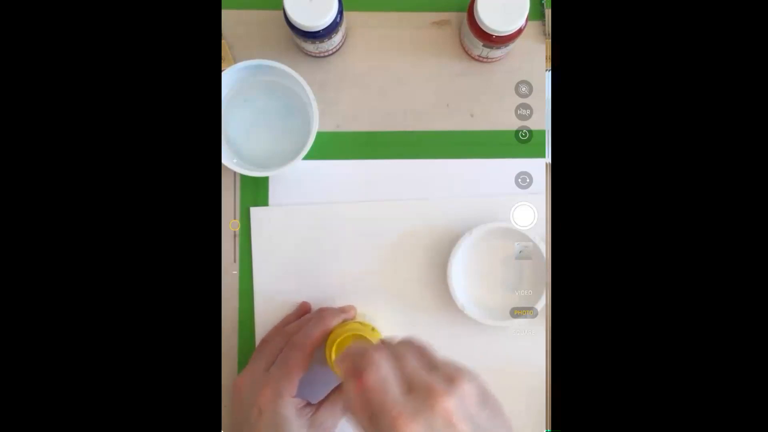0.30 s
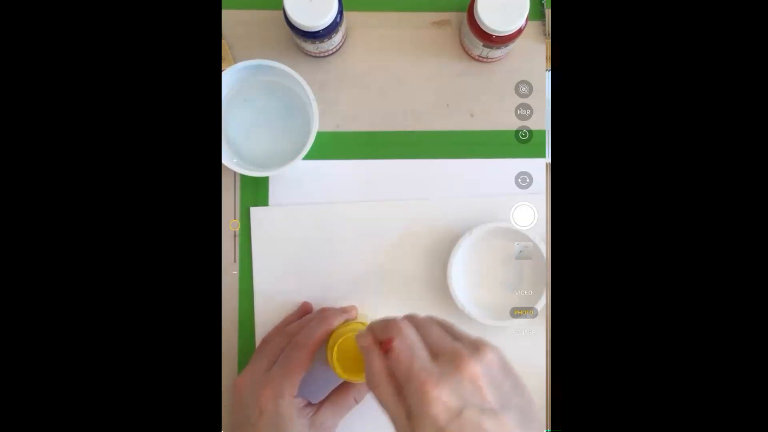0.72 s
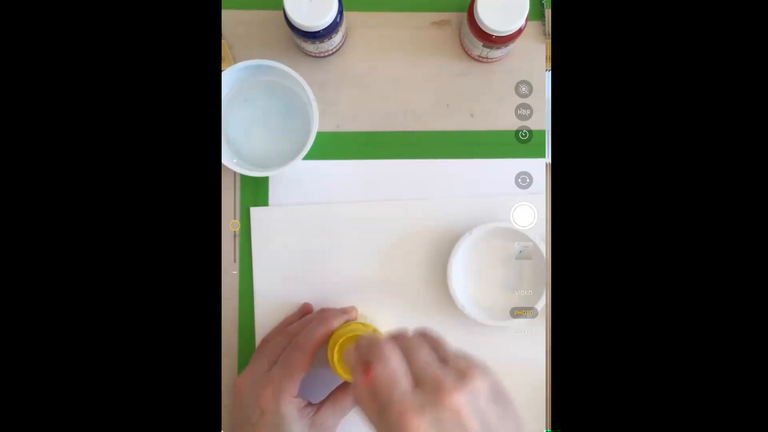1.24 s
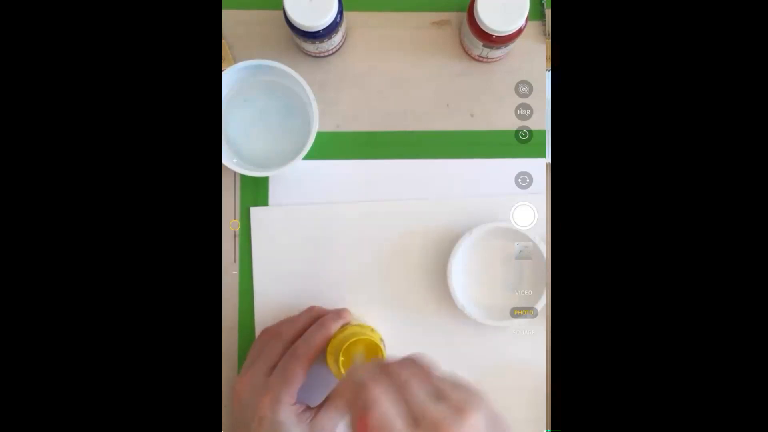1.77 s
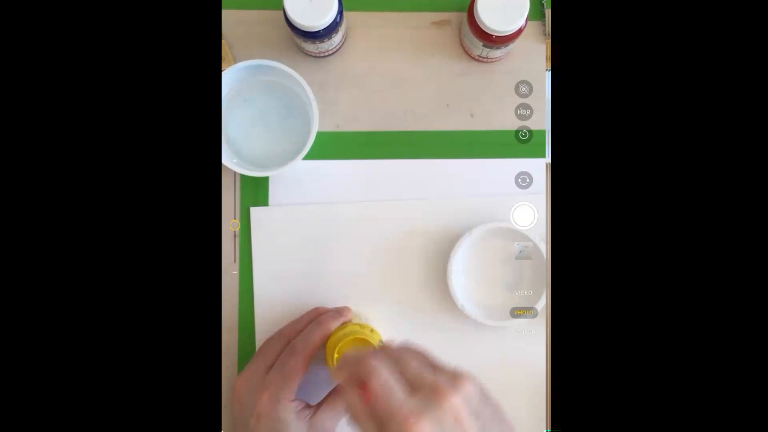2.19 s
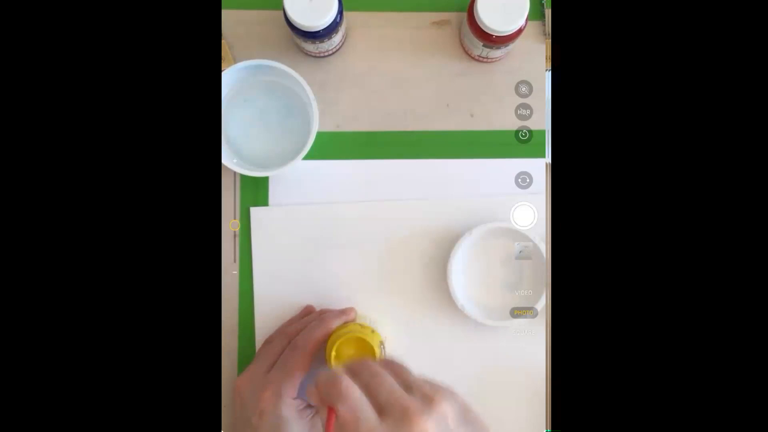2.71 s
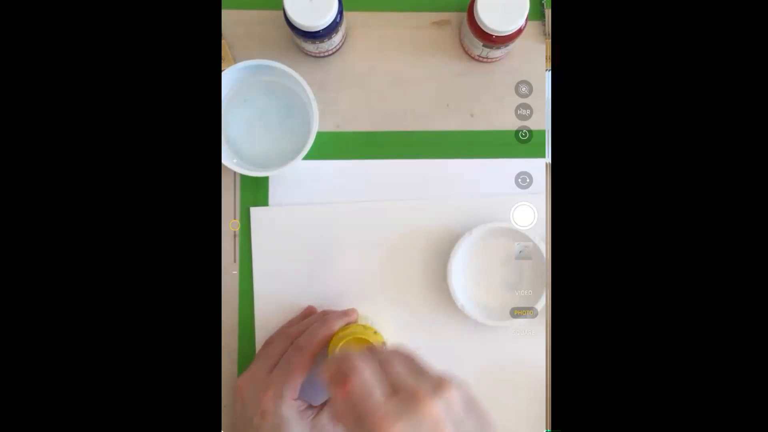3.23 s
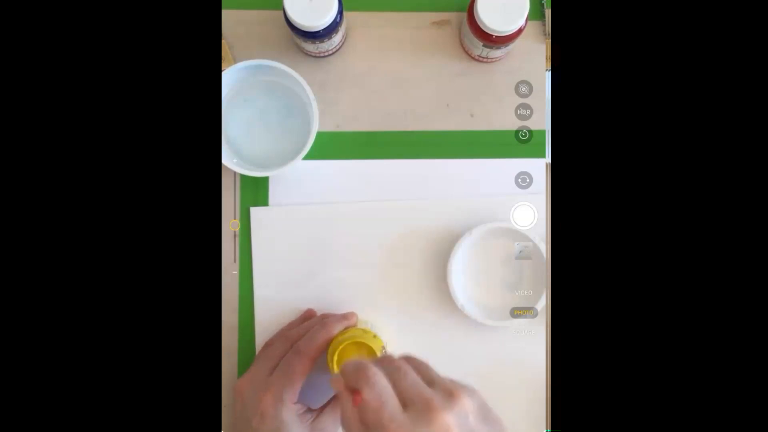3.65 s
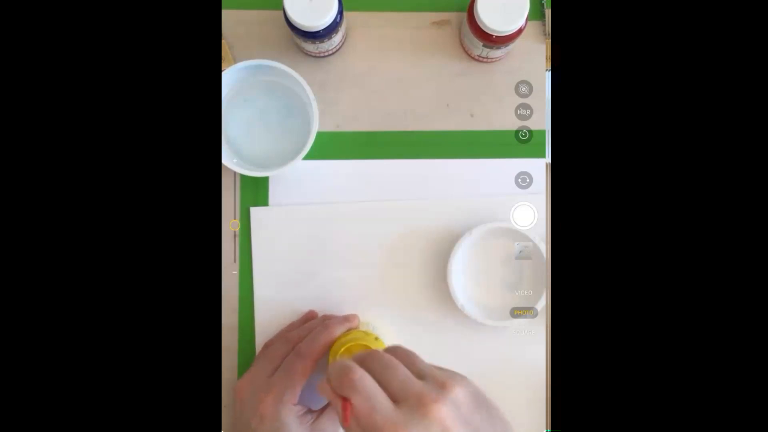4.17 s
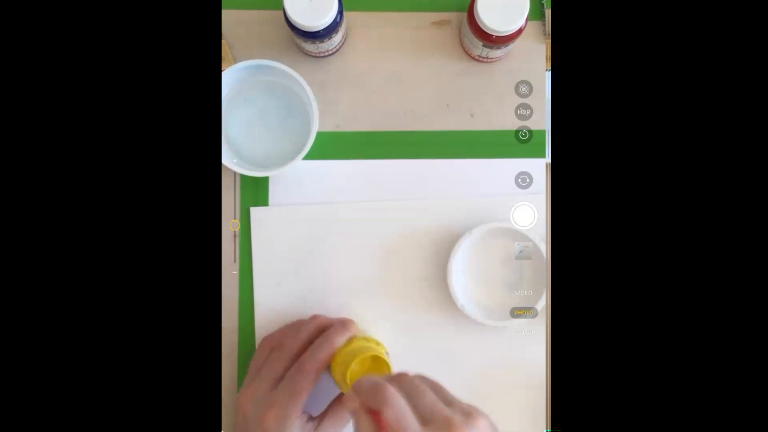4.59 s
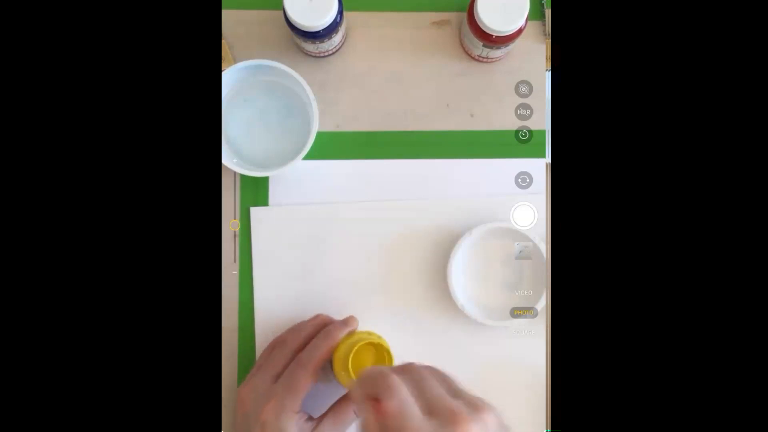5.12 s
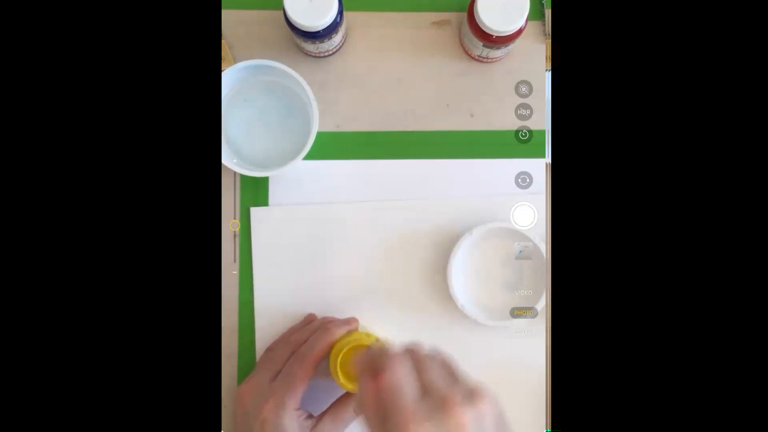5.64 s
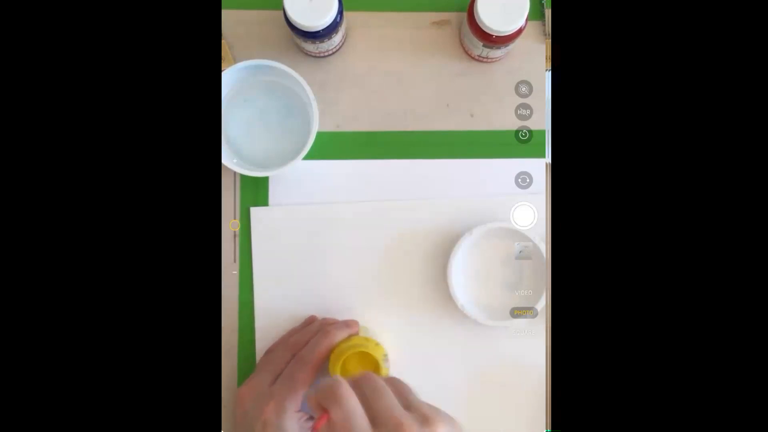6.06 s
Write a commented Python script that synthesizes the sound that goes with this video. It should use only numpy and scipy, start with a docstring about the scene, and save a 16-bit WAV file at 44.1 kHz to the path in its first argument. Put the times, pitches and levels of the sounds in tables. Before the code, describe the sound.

A stick stirs settled paint in a small soft plastic jar held on a desk, heard close in a small, quiet room. A sharp rim click opens at 0 s, another comes near 0.15 s, and light hollow knocks follow, with barely audible wet squeaks around 0.1, 0.6 and 1.1 s. A fuller knock with a low desk boom lands at 0.95 s. After 1.3 s there is a sparse gap, then clicks at 1.5 to 1.8 s. From 2 to 3 s knocks and snaps become stronger. Between 3.1 and 3.6 s it is busiest: crowded clicks, thuds and a gritty scrape. From 3.75 to 4.5 s only a few clicks remain. From 4.75 s firm, dull plastic knocks with soft booms return about every 0.2 s, strongest at 6.1 s. All are short and dry, with a slight room echo over faint hiss.

```python
"""Clicks, knocks, low booms, scrapes and squeaks: a stick stirs settled paint in a small plastic jar
that a hand holds on a desk. The jar and desk are sets of swelling and dying sine waves (modes) set off
by blows; the stick on the rim is shaped noise, the scrape is many tiny slips, the squeaks are fuzzy tones.
A small room answers every sound over a quiet hiss; a noise suppressor dries the faint tails."""
import sys
import numpy as np
from scipy import signal
from scipy.fft import rfft, irfft
from scipy.io import wavfile
from scipy.ndimage import uniform_filter1d

SR = 44100
rng = np.random.default_rng(int(sys.argv[2]) if len(sys.argv) > 2 else 0)


def int16_out(signal):
    """Quantize to a 16-bit WAV file."""
    q = np.round(np.clip(np.atleast_2d(signal).T, -1, 1) * 32767)
    wavfile.write(sys.argv[1], SR, q.astype(np.int16))


N = 279594  # samples in the finished sound
LEAD = SR // 10  # extra samples before zero, so that a blow can start a little early

# The jar rocking onto the desk; each function adds its own level trim to these:
# (t/s, main ring level/dB, slant: upper ring over main ring/dB, hard edge level/dB, desk boom level/dB)
KNOCKS = [(0.0632, -38.5, 7, -66, -43.5), (0.2573, -41.5, 8, -70, -43), (0.3556, -44.5, -3.5, -81, -36.5),
          (0.6664, -51, 7.5, -77.5, -42), (0.7894, -42, -10.5, -90, -42), (0.8844, -50, 0.5, -78, -39.5),
          (0.9362, -32, -5.5, -91.5, -30), (1.0731, -39.5, -18, -43, -39.5),
          (1.2642, -33.5, -7.5, -37, -46), (1.8553, -34.5, -6.5, -70.5, -36.5),
          (2.0389, -40.5, -3.5, -92.5, -57), (2.0776, -35.5, -3.5, -33.5, -38.5),
          (2.2849, -27.5, -6, -36, -33), (2.5472, -26.5, -11.5, -53, -35.5),
          (2.7592, -29, -14, -52.5, -57.5), (2.9816, -35.5, 2, -47, -28), (3.2357, -28.5, 3.5, -39.5, -30),
          (3.3478, -40, 16, -31, -73), (3.5574, -43, 6, -53, -63), (3.7308, -57.5, 13.5, -93, -34.5),
          (4.5044, -37, -5.5, -83.5, -39.5), (4.741, -20.5, -7, -31, -28), (4.8491, -39.5, -3.5, -81, -64),
          (4.995, -28, -9.5, -54, -35.5), (5.202, -24.5, -5, -39.5, -27.5), (5.4098, -24.5, -3.5, -32, -35),
          (5.4842, -44.5, 2.5, -76.5, -57.5), (5.645, -23.5, -5, -52, -28.5),
          (5.7759, -34.5, -22, -61.5, -60), (5.8933, -24, -7.5, -62.5, -29),
          (6.1181, -19, -5.5, -40.5, -24)]


def amp(db):
    """Turns decibels into a gain."""
    return 10 ** (np.asarray(db) / 20)


def unit(x):
    """Scales a sound to an rms (average strength) of one."""
    return x / np.sqrt(np.mean(x ** 2) + 1e-20)


def read(points, hz):
    """Reads a table between its points, along a log-frequency axis."""
    f, value = np.transpose(points)
    return np.interp(np.log(hz + 1), np.log(f + 1), value)


def add(mix, s, sound):
    """Mixes a sound in at time s (seconds); the track starts a little before zero."""
    start = max(round(s * SR) + LEAD, 0)
    part = mix[start:][:len(sound)]
    part += sound[:len(part)]


def ring(modes, order, force_db=0):
    """Modes swell and die after a cushioned blow; neighbours swing in opposite senses."""
    hz, db, swell_s = np.transpose(modes)[:, :, None]
    t = np.arange(SR // 5) / SR
    envelope = (t / swell_s * np.exp(1 - t / swell_s)) ** order  # peaks at one when t = swell_s
    swing = envelope * np.sin(2 * np.pi * hz * t)
    sign = -(-1) ** np.arange(len(hz))
    return (sign * amp(force_db)) @ (amp(db) * swing)


def jar_modes():
    """Soft plastic damps every mode of the jar within a few cycles."""
    # modes of the jar on the desk: (f/Hz, relative level/dB, time to full swing before the limit below/s)
    jar_table = [(850, 2, 0.0029), (1012.4, -15.5, 0.014), (1315, 2, 0.0018), (1607, -3.5, 0.0019),
                 (2120, -8, 0.00057), (2685, -0.5, 0.00052), (3296, -4.5, 0.0019), (3675, -7.5, 0.0048),
                 (5020, -8.5, 0.0035), (6950, -33.5, .0012)]
    modes = np.array(jar_table)
    modes[:, 2] = np.minimum(modes[:, 2], 7 / modes[:, 0])  # full swing within 7 cycles
    return modes


def air(level_db=-62):
    """The steady, dull background of a quiet room: noise coloured by frequency."""
    # colour of the background: (f/Hz, relative level per Hz/dB)
    air_colour = [(18, -55.5), (30, -20), (98, -4), (184, -6), (584, -12.5), (1430, -23.5), (1910, -27.5),
                  (3220, -31.5), (4080, -37), (11400, -42.5), (16000, -65.5)]
    hz = np.fft.rfftfreq(N, 1 / SR)
    spectrum = rfft(rng.standard_normal(N)) * amp(read(air_colour, hz))
    return amp(level_db) * unit(irfft(spectrum, N))


def tail(build_s=0.0019, hold_s=0.01, late_db=-24, late_t60=.6, taps_per_s=4000):
    """Reflections build up and hold, then each band dies at its own speed over a faint, longer wash."""
    # time for each band to fall by 60 dB: (f/Hz, time/s)
    band_t60 = [(150, 0.07), (900, 0.3845), (1500, 0.4146), (4000, 0.3), (7000, 0.28), (13000, 0.12)]
    # colour of the tail: (f/Hz, relative level/dB)
    band_db = [(100, -20.5), (220, 1.5), (400, 0), (900, -7), (1400, -2), (2300, -8.5), (4000, -5.5),
               (7000, -12), (13000, -10.5)]
    t = np.arange(SR // 2) / SR
    taps = rng.choice([-1., 1.], len(t)) * (rng.random(len(t)) < taps_per_s / SR)
    taps *= 1 - np.exp(-t / build_s)
    hz, when, z = signal.stft(taps, SR, nperseg=256)
    fall = -60 * np.maximum(when - hold_s, 0)  # divided by a t60 this gives dB
    early = amp(fall / read(band_t60, hz)[:, None])
    late = amp(late_db + fall / late_t60)
    z = z * np.hypot(early, late)
    z *= amp(read(band_db, hz))[:, None] / np.linalg.norm(z, axis=1, keepdims=True)
    return signal.istft(z, SR, nperseg=256)[1] / 148  # overall room level


def room(x, cycles_hz=1.1, count=5):
    """The echo crossfades between several random tails, so that no single tail colours every blow."""
    place = cycles_hz * count * np.arange(len(x)) / SR
    out = 0
    for k in range(count):
        away = (place - k) % count - count / 2  # distance from where tail k is strongest
        share = np.cos(np.pi / 2 * np.clip(away, -1, 1))
        out = out + signal.fftconvolve(x * share, tail())[:len(x)]
    return out


def squeaks(width_hz=210):
    """Wet friction of stick on wall: a fuzzy whistle that slides in pitch."""
    # stick rubbing along the wall: (start t/s, length/s, start f/Hz, end f/Hz, level before fades/dB)
    rubs = [(.06, 0.046, 4410, 4185, -63.5), (0.547, 0.11, 4500, 4250, -73),
            (0.634, 0.088, 4200, 3920, -70), (1.099, 0.042, 4354, 4423, -63),
            (1.147, 0.026, 4020, 3970, -64.5)]
    out = np.zeros(N + LEAD)
    smooth = signal.butter(2, width_hz, fs=SR, output="sos")
    for s, length, start_hz, end_hz, db in rubs:
        count = round(length * SR)
        noise = [1, 1j] @ rng.standard_normal((2, SR // 4))
        grip = signal.sosfilt(smooth, noise)[:count]  # slow wobble that makes the tone fuzzy
        turns = np.cumsum(np.linspace(start_hz, end_hz, count)) / SR
        whistle = (grip * np.exp(2j * np.pi * turns)).real
        add(out, s, amp(db) * unit(whistle) * signal.windows.tukey(count, .7))
    return out


def scrape(level_db=0, slips_per_s=220, uneven_db=5, main_db=-7, edge_db=-15):
    """The dragged stick catches and slips at random; each slip rings the jar."""
    # pressure of the stick dragged round the wall in the most vigorous turns: (t/s, level/dB)
    drag = [(3.13, -70.5), (3.165, -49.5), (3.2, -76.5), (3.245, -47), (3.28, -56), (3.345, -42.5),
            (3.46, -66.5), (3.53, -50), (3.59, -68.5)]
    t, modes = (np.arange(N + LEAD) - LEAD) / SR, jar_modes()
    slips = (rng.random(len(t)) < slips_per_s / SR) * amp(uneven_db * rng.standard_normal(len(t)))
    pressure = amp(np.interp(t, *np.transpose(drag), left=-np.inf, right=-np.inf))  # silent outside
    colour = [(1050, main_db), (1250, 0.021), (1700, 0.028), (2500, edge_db)]  # (f/Hz, level/dB)
    wall = ring(modes, order=3, force_db=read(colour, modes[:, 0]))
    sound = signal.fftconvolve(unit(slips) * pressure, wall / np.linalg.norm(wall))
    return amp(level_db) * sound[:len(t)]


def booms(knock_db=(-2, -1, -2), thud_db=(-6, 0, 3), bottom_db=-1.0, lag_s=0.0013):
    """Knocks and thuds drive the desk top, whose boom comes back from floor and wall."""
    # dull thuds on desk and jar bottom, mostly the stick pushing through the paint onto the bottom, a few
    # following rim clicks: (t/s, level before trims/dB)
    thuds = [(-0.008, -34.5), (1.723, -44.5), (2.079, -36.5), (2.135, -39), (2.174, -41), (2.391, -37.5),
             (2.745, -29.5), (3.057, -46), (3.359, -28.5), (3.423, -38.5), (3.541, -33), (3.556, -29.5),
             (4.286, -50), (4.355, -55), (5.292, -45.5), (5.508, -45), (5.731, -37), (5.757, -39.5),
             (5.776, -27)]
    # how firmly the stick reaches the bottom through the paint: (t/s, level/dB)
    dig = [(0, -37.5), (1.7, -18.5), (2.08, -7), (2.39, -29.5), (2.75, -4), (3.4, -2), (4.3, -28.5),
           (6.3, -28)]
    # modes of the desk top: (f/Hz, level before trims/dB, time to full swing/s)
    desk_modes = [(101.4, -7, 0.012), (184, -2, 0.0045), (302, -36, 0.04)]
    # modes of the bottom of the jar: (f/Hz, level before trims/dB, time to full swing/s)
    bottom_modes = [(211.4, 0.5, 0.012), (299, -3, 0.014), (368, -7.5, 0.0077), (439, -4.5, 0.0054),
                    (660, -9, 0.00067)]
    # direct boom and its returns from floor and wall: (delay/s, gain)
    returns = [(0, 1), (0.0131, -1.1), (0.0284, -0.91), (0.0478, 0.63)]
    desk, bottom, out = np.zeros((3, N + LEAD))
    heavy = ring(desk_modes, order=1, force_db=knock_db)
    light = ring(desk_modes, order=1, force_db=thud_db)  # the stick moves the lowest mode less
    thud = ring(bottom_modes, order=1, force_db=bottom_db)
    for s, *_, db in KNOCKS:
        add(desk, s + lag_s, amp(db) * heavy)
    for s, db in thuds:
        add(desk, s, amp(db) * light)
        firm_db = np.interp(s, *np.transpose(dig))
        add(bottom, s, amp(db + firm_db) * thud)
    for delay, gain in returns:
        out += gain * np.roll(desk, round(delay * SR))
    return out + bottom


def knocks(level_db=-3, upper_db=-1, edge_db=0, main_hz=882.5, hz_per_slant_db=4, detune=0.019,
           uneven_db=3.5, grit_s=0.01, bounce_s=.005, bounce_db=-11, settle_db=-24, count=2):
    """The jar lands a little differently each time, bounces, grinds briefly and settles."""
    out, t = np.zeros(N + LEAD), np.arange(SR // 10) / SR
    for s, db, slant, edge, _ in KNOCKS:
        modes, upper = jar_modes(), db + slant + upper_db
        colour = [(1050, db), (1250, upper), (2050, upper), (2500, edge + edge_db)]  # (f/Hz, level/dB)
        force_db = read(colour, modes[:, 0])
        force_db += uneven_db * rng.uniform(-1, 1, len(modes))
        modes[:, 0] *= 1 + detune * rng.uniform(-1, 1, len(modes))
        modes[0, 0] = main_hz + hz_per_slant_db * slant  # a slanting knock rings higher
        grit = .03 * rng.standard_normal(len(t))
        contact = grit * np.exp(-t / grit_s)
        contact[0] += 1  # the first blow
        contact[round(bounce_s * rng.uniform(.5, 1.5) * SR)] += amp(bounce_db)
        contact[rng.integers(SR // 100, len(t), count)] += amp(settle_db)  # small touches as it settles
        add(out, s, signal.fftconvolve(contact, ring(modes, order=3, force_db=force_db)))
    return amp(level_db) * out


def click(body_db, top_db, chatter_s=0.0026, bounce=0.78, bounce_s=.0019):
    """A contact and its rebound set off chatter in stick and rim; gives (start s, sound)."""
    # colour of the crowded modes of stick and rim: (f/Hz, relative level/dB)
    rim_colour = [(250, -32.5), (600, -18), (1250, -2.5), (1800, -2), (2500, -3), (4200, -13), (5400, -8.5),
                  (7200, -7.5), (8200, -15.5), (9400, -22), (11000, -4.5), (13000, -6), (15000, -28)]
    t = np.arange(-SR // 200, SR // 25) / SR
    hz = np.fft.rfftfreq(len(t), 1 / SR)
    rebound = t - bounce_s * rng.uniform(.8, 1.2)
    force = (t >= 0) * np.exp(-abs(t) / chatter_s)
    force += bounce * (rebound >= 0) * np.exp(-abs(rebound) / chatter_s)
    chatter = force * rng.standard_normal(len(t))
    balance = [(2400, body_db), (3300, 0), (8100, 0), (10500, top_db)]  # body, snap, top: (f/Hz, level/dB)
    colour_db = read(rim_colour, hz) + read(balance, hz)
    return t[0], irfft(rfft(chatter) * amp(colour_db), len(t))


def clicks(level_db=7, body_db=4, top_db=3, jolt_db=-11, jolt_body_db=9, jolt_top_db=-25):
    """The stick strikes the rim; each knock also jolts it dully on the wall, more so with a hard edge."""
    # stick hitting the rim, before the trims above:
    # (t/s, snap level/dB, body relative to the snap/dB, top relative to the snap/dB)
    rim_hits = list([(-0.025, -18, -12, -22.5), (0.1611, -19.5, -14, -16), (0.883, -56.5, 1, -27.5),
                (1.4992, -41.5, -0.5, -19), (1.7069, -37.5, -14.5, -48.5), (1.821, -21, -10.5, -20.5),
                (2.074, -29.5, -0.5, -34), (2.1516, -43, -1, -45), (2.7448, -18, -8, -21),
                (3.0573, -20.5, -13.5, -22), (3.2598, -17, -11, -20), (3.361, -29, -1.5, -16),
                (3.445, -21, -14.5, -20), (4.0931, -30, -19, -21.5), (4.3545, -23.5, -10.5, -39.5),
                (5.035, -31, -12.5, -22.5), (5.089, -51, 4, -20), (5.2976, -36.5, -13, -11.5),
                (5.7758, -39.5, -4, -19)])
    out = np.zeros(N + LEAD)
    for s, db, body, top in rim_hits:
        start, sound = click(body + body_db, top + top_db)
        add(out, s + start, amp(db + level_db) * sound)
    for s, _, _, edge, _ in KNOCKS:
        start, sound = click(jolt_body_db, jolt_top_db)
        add(out, s + start, amp(edge + jolt_db) * sound)
    return out


def scene():
    """All the blows, the scraping and squeaking, their room and the background."""
    direct = knocks() + booms() + clicks() + scrape() + squeaks()
    in_room = direct + room(direct)
    return (in_room[LEAD:] + air())[None]


def suppress(x, depth_db=-9, threshold_db=15, size=1024):
    """Noise suppressor: bins that stay near their own background level are turned down."""
    overlap = size * 3 // 4
    z = signal.stft(x, nperseg=size, noverlap=overlap)[2]
    power = uniform_filter1d(abs(z) ** 2, size=9, axis=1)  # averaged over neighbouring bins
    background = np.percentile(power, 20, axis=2, keepdims=True)
    threshold = background * amp(threshold_db) ** 2
    opening = power ** 2 / (power ** 2 + threshold ** 2 + 1e-60)  # 0 = turned down, 1 = untouched
    return signal.istft(z * amp(depth_db * (1 - opening)), nperseg=size, noverlap=overlap)[1][:, :N]


def record(dry, low_cut_hz=58, edge_hz=15900):
    """The small microphone loses the deep bass; then noise suppression and a limit on the treble."""
    thin = signal.sosfilt(signal.butter(2, low_cut_hz, "high", fs=SR, output="sos"), dry)
    band_limit = signal.firwin(511, edge_hz, window=("kaiser", 9), fs=SR)
    return signal.oaconvolve(suppress(thin), band_limit[None], "same")


dry = scene()
out = record(dry)
int16_out(out)
```